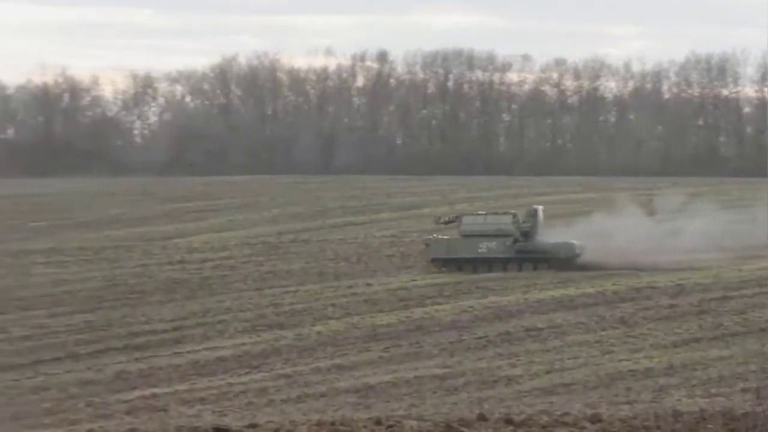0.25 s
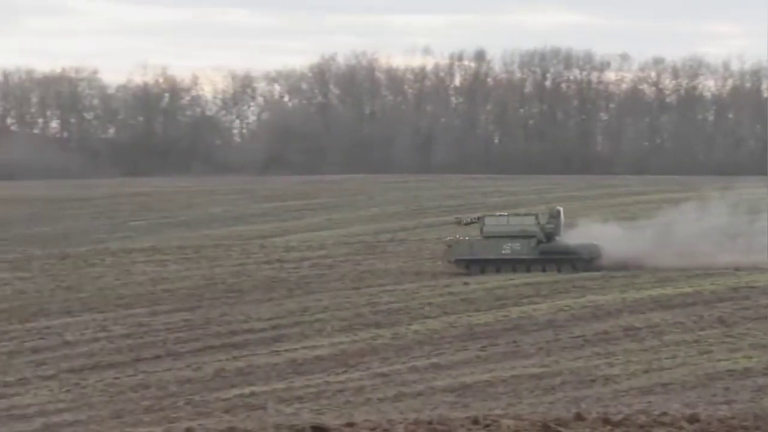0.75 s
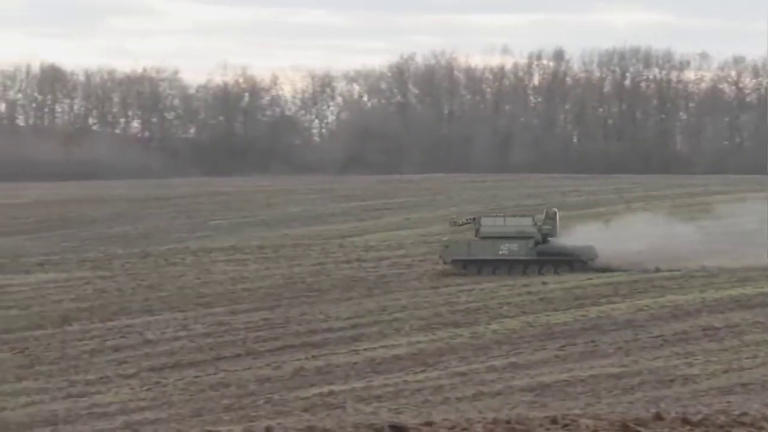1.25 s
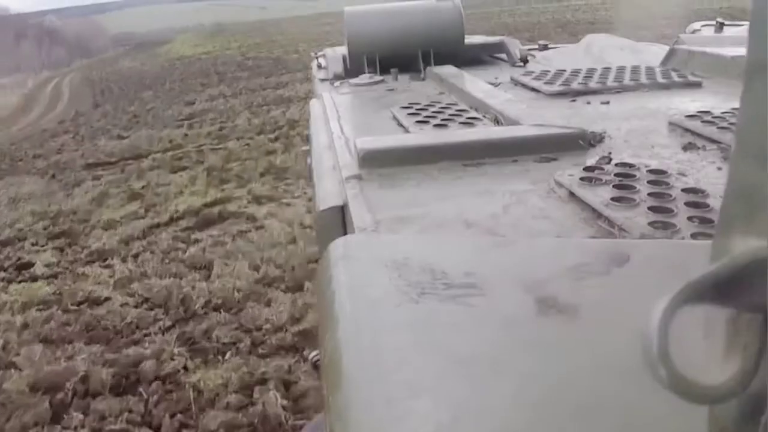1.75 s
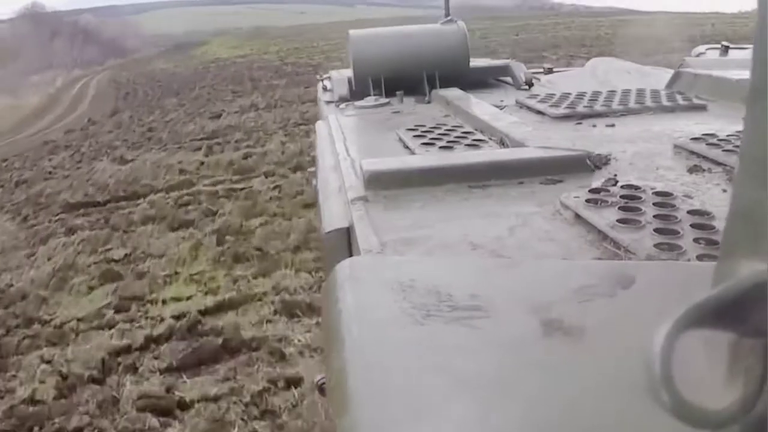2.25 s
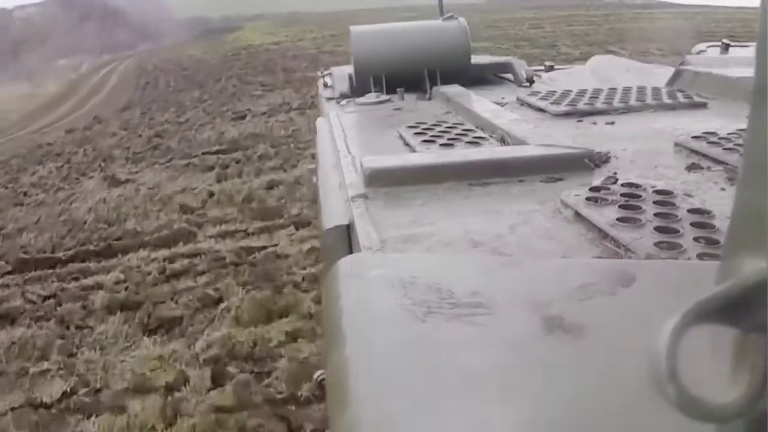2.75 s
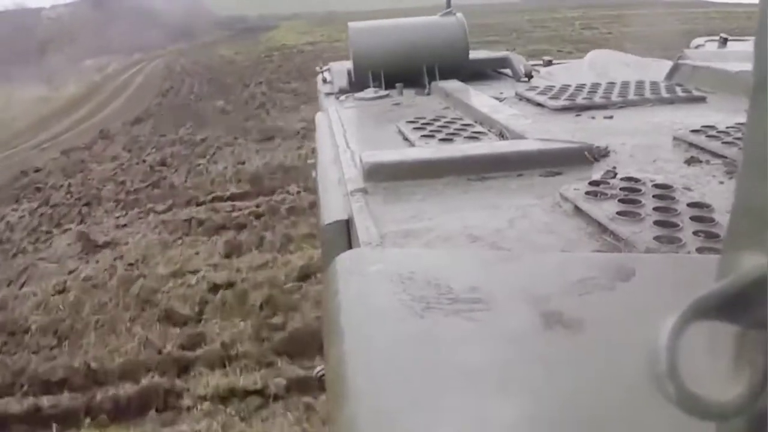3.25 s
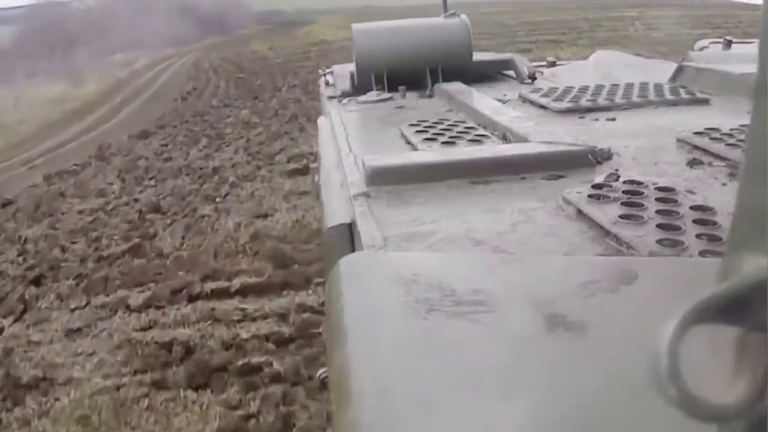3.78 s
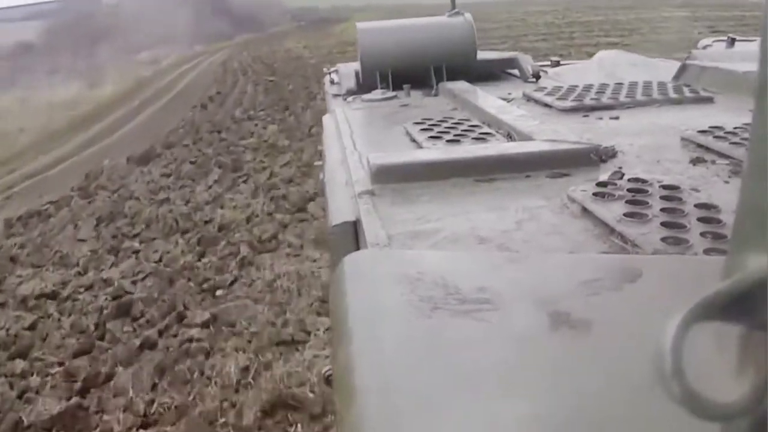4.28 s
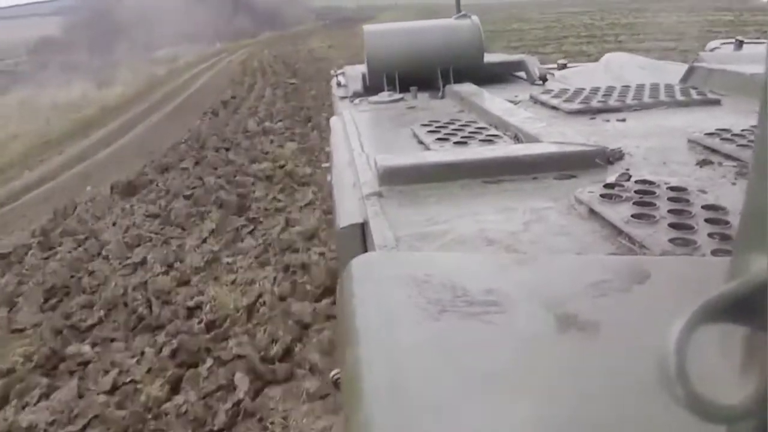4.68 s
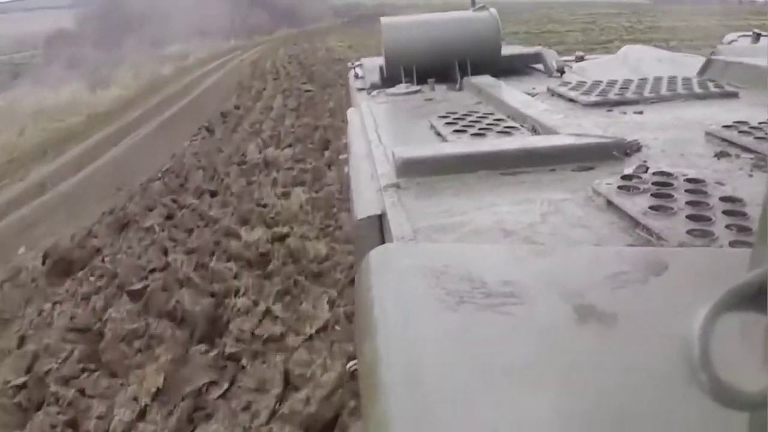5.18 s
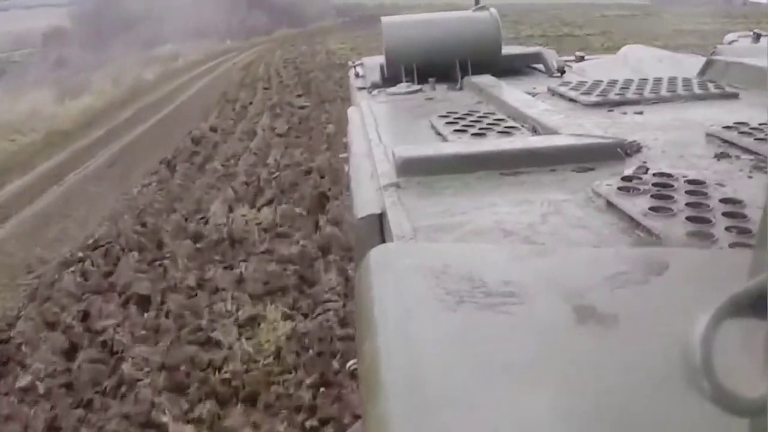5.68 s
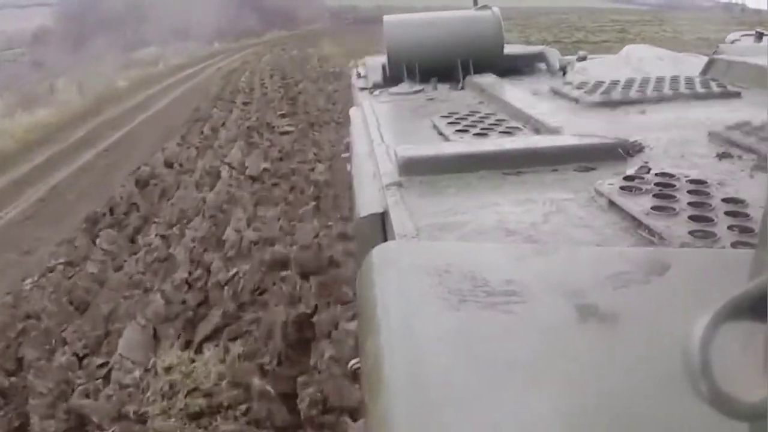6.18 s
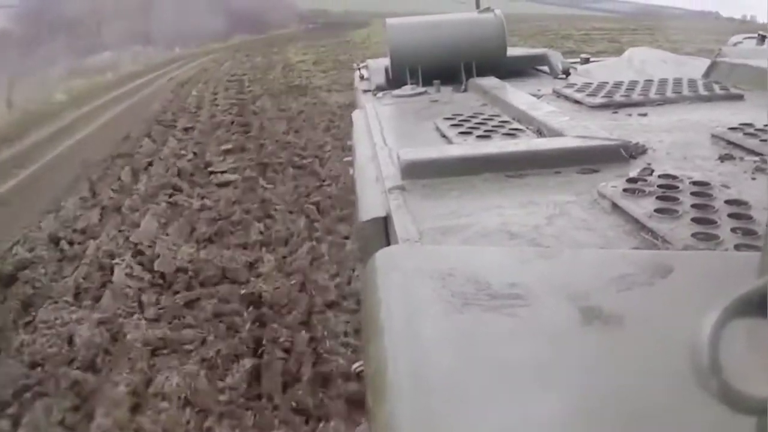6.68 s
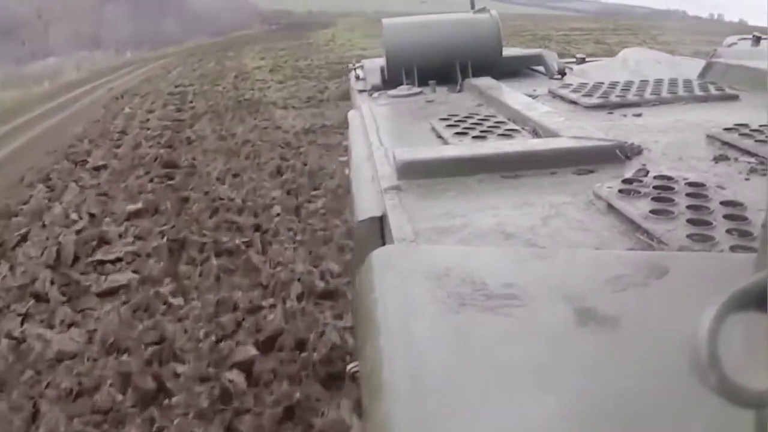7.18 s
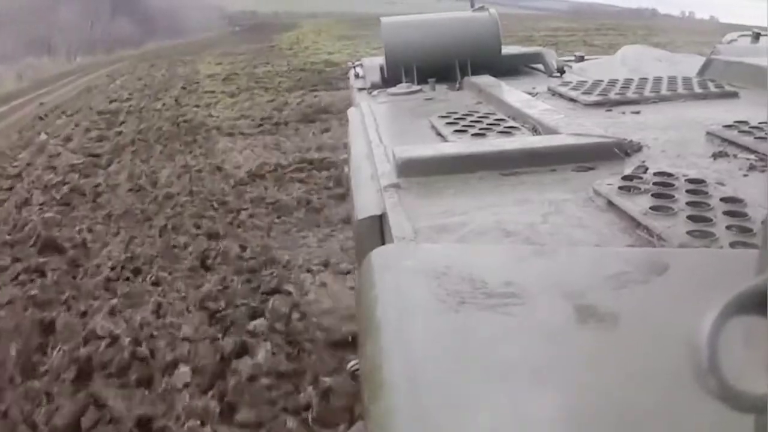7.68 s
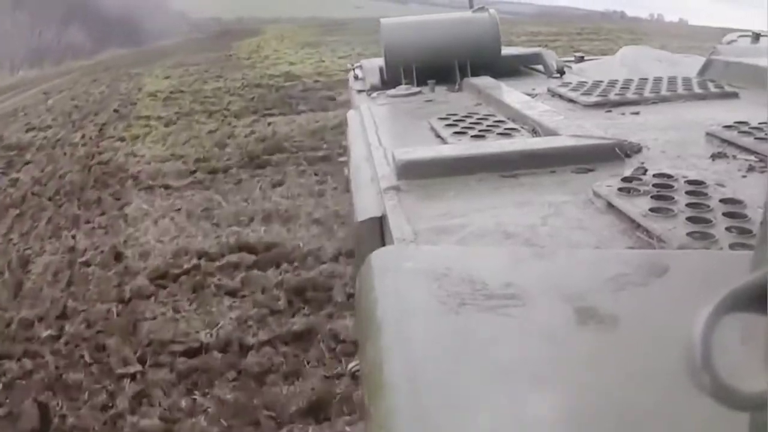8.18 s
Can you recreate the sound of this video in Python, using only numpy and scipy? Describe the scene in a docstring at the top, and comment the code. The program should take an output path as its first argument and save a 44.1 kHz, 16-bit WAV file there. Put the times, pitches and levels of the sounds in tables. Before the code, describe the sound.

Wind rumbles over faint distant tracks, then a tracked armoured vehicle is heard from on board, booming, clattering and clanking over rough ground.

```python
"""A lumpy low rumble and buffets, likely wind on the microphone, under the faint hiss of distant tracks:
an armoured vehicle crosses a ploughed field. Then the microphone rides on its deck, where the track links
beat on the wheels and, with the engine, set the hull booming. The running gear clatters as hard as the
ground is rough, flaring at jolts and easing in short lulls. Close by, the track knocks on the hull,
heavy steel parts clank and loose fittings chink. A limiter holds the peaks down."""
import sys
import numpy as np
from scipy import signal
from scipy.fft import rfft, irfft
from scipy.io import wavfile
from scipy.ndimage import uniform_filter1d, minimum_filter1d

SR = 44100
rng = np.random.default_rng(int(sys.argv[2]) if len(sys.argv) > 2 else 0)


def store_pcm(level_fs):
    """Save levels as 16-bit WAV."""
    pcm = np.round(np.clip(level_fs, -1, 1) * 32767).astype(np.int16)
    wavfile.write(sys.argv[1], SR, np.atleast_2d(pcm).T)


N = 372330
TIME = np.arange(N) / SR

# spectrum of moving air on the microphone: f/Hz, level/dB
BUFFET_SPECTRUM = [(12, -18), (28, 4), (80, 2.5), (140, -12), (300, -44), (900, -71.5), (3000, -110)]
# resonances of the deck plates: f/Hz, width/Hz, gain/dB
PLATE_MODES = [(734, 37, 4), (800, 8, 3), (1545, 110, 0), (2774, 49, -1.5)]
# spectrum of a loose fitting's dry tick: f/Hz, level/dB
TICK_SPECTRUM = [(1200, -14.5), (2600, 1.5), (3500, -7.5), (4150, -13.5), (4450, -6), (5800, -5),
                 (6600, -9), (8000, -7), (9000, -13.5), (10500, -29), (14500, -41.5)]


def from_db(db):
    return np.exp(np.asarray(db) * np.log(10) / 20)


def rms_one(x):
    return x / np.sqrt(np.mean(x ** 2) + 1e-20)


def evened(x, span_s):
    """Hold the running rms at 1."""
    return x / np.sqrt(np.abs(uniform_filter1d(x ** 2, int(span_s * SR))) + 1e-12)


def in_time(rows):
    """Columns of a curve table, one value a sample."""
    s, *columns = np.transpose(rows)
    return [np.interp(TIME, s, column) for column in columns]


def drift(per_s):
    """A random wander of rms 1, with about per_s turns a second."""
    knots = rng.standard_normal(N // 10)
    return rms_one(np.interp(TIME * per_s, np.arange(len(knots)), knots))


def butterworth(x, order, hz, kind="low"):
    return signal.sosfilt(signal.butter(order, hz, kind, fs=SR, output="sos"), x)


def bin_gains(spectrum, size):
    """A spectrum table as one gain for each FFT bin."""
    hz, db = np.transpose(spectrum)
    return from_db(np.interp(np.log(np.fft.rfftfreq(size, 1 / SR) + 1), np.log(hz), db))


def coloured(x, spectrum, size=16384):
    """Minimum-phase filter with the given spectrum: attacks stay sharp."""
    cepstrum = irfft(np.log(bin_gains(spectrum, size)))[:size // 2]
    cepstrum[1:] *= 2
    return signal.oaconvolve(x, irfft(np.exp(rfft(cepstrum, size))))[:N]


def rounded(x, spectrum, size=2048):
    """Filter with the given spectrum whose pulses swell and fall evenly, as in a soft contact."""
    pulse = np.fft.fftshift(irfft(bin_gains(spectrum, size))) * np.hanning(size)
    return signal.oaconvolve(x, pulse, mode="same")


def resonate(x, modes):
    """Parallel two-pole resonances, one for each row of f/Hz, width/Hz, gain/dB."""
    out = 0
    for hz, width_hz, db in modes:
        r = np.exp(-np.pi * width_hz / SR)
        feedback = [1, -2 * r * np.cos(2 * np.pi * hz / SR), r * r]
        out = out + from_db(db) * (1 - r * r) / 2 * signal.lfilter([1, 0, -1], feedback, x + 1e-18)
    return out


def add(out, s, sound):
    """Mix a short sound in at time s."""
    at = int(s * SR)
    out[at:at + len(sound)] += sound[:N - at]


def swells(rows):
    """Smooth humps in dB, one for each row of t/s, length/s, height/dB."""
    out = np.zeros(N)
    for s, length_s, db in rows:
        t = np.arange(-2 * length_s, 2 * length_s, 1 / SR)
        add(out, s - 2 * length_s, db * np.exp(-(2 * t / length_s) ** 2))
    return out


def grains(per_s, spread_db):
    """Random contacts of uneven strength, one impulse each."""
    at = np.flatnonzero(rng.random(N) < per_s / SR)
    strength, direction = rng.standard_normal((2, N))[:, at]
    out = np.zeros(N)
    out[at] = from_db(spread_db * np.minimum(strength, 2.5)) * np.sign(direction)
    return out


def scuff(rise_s):
    """One touch of steel on steel: noise that swells for rise_s and quickly dies."""
    t = TIME[:SR // 25] / rise_s
    return rng.standard_normal(len(t)) * (t * np.exp(1 - t)) ** 3


def chatter(per_s, spread_db, touch_s):
    """Separate touches at random moments, each a short swell of noise."""
    r = np.exp(-1 / (touch_s * SR))
    pressure = signal.lfilter([1], [1, -2 * r, r * r], np.abs(grains(per_s, spread_db)) + 1e-18)
    return rms_one(pressure) * rng.standard_normal(N)


def low_rumble():
    """In the open field, a lumpy low rumble, likely wind on the microphone."""
    # spectrum of the rumble: f/Hz, level/dB
    spectrum = [(12, -21), (22, 2.5), (55, -5), (76, 2), (100, -4), (135, -4), (200, -11.5), (300, -19.5),
                (420, -29.5), (700, -41.5), (1500, -61)]
    # its rise and fall: t/s, level/dB, gain above 150 Hz/dB
    levels = [(0, -27, 3), (.14, -29.5, -0.5), (.25, -29, 0.5), (.33, -34.5, -0.5), (.4, -32, -0.5),
              (.5, -35, -7), (.57, -30, 3), (.7, -34, -5.5), (.8, -30, -4), (.87, -30, -3),
              (1.05, -31, 2.5), (1.17, -34, 3.5), (1.22, -31.5, 1), (1.36, -31.5, 2.5), (1.46, -34, 1.5),
              (1.6, -28, 1)]
    level_db, upper_db = in_time(levels)
    rumble = evened(coloured(rng.standard_normal(N), spectrum), span_s=0.058)
    rumble = butterworth(rumble, order=4, hz=900)
    deep = butterworth(rumble, order=1, hz=150)
    return from_db(level_db) * (deep + from_db(upper_db) * (rumble - deep))


def far_tracks():
    """The distant tracks: a faint, fluttering hiss, brighter as they draw level with the microphone."""
    # spectrum of the hiss: f/Hz, level/dB
    spectrum = [(200, -16), (800, 2), (950, -1), (1250, 1), (1700, -1.5), (2000, 0), (2500, -1.5),
                (3200, -7), (4200, -14), (5000, -26), (9000, -28), (15000, -36)]
    # a faint whine in it: f/Hz, width/Hz, gain/dB
    whine_mode = [(820, 25, 3)]
    # the approach: t/s, level/dB, gain of the treble above 2 kHz/dB
    levels = [(0, -64.5, -4), (.25, -66, -3.5), (.42, -65.5, -3), (.56, -64, -2), (.8, -63, -1),
              (1.1, -61.3, 0), (1.3, -61, 0), (1.66, -61.5, -1)]
    level_db, treble_db = in_time(levels)
    hiss = rms_one(coloured(rng.standard_normal(N), spectrum)) * from_db(1.1 * drift(per_s=25))
    hiss = hiss + resonate(hiss, whine_mode)
    dull = butterworth(hiss, order=1, hz=2000)
    return from_db(level_db) * (dull + from_db(treble_db) * (hiss - dull))


def wind():
    """Gusts in the open field strike the microphone in short, deep buffets."""
    # gusts: t/s, length/s, level/dB
    gusts = [(0.09, 0.043, -23.5), (.39, 0.19, -30), (0.612, 0.042, -25.5), (1.11, 0.034, -28.5),
             (1.531, 0.041, -25.5)]
    force = sum(from_db(db) * np.exp(-(2 * (TIME - s) / length_s) ** 2) for s, length_s, db in gusts)
    return force * evened(coloured(rng.standard_normal(N), BUFFET_SPECTRUM), span_s=0.026)


def gear_load():
    """Swing of the load on the running gear in dB: jolts, lulls and the jostling of small clods."""
    # jolts, when the rattle flares: t/s, length/s, rise/dB
    jolts = [(1.695, 0.018, 4), (1.821, 0.064, 10.5), (2.067, 0.12, 4), (2.364, 0.13, 3.5),
             (2.524, 0.07, 1), (2.89, 0.038, 5), (3.224, 0.1, 2.5), (3.32, 0.065, 3), (3.795, 0.025, 3),
             (4.931, .022, 5), (5.71, 0.17, 5), (6.43, 0.061, 1), (7.181, .015, -1), (7.69, 0.076, 4.5),
             (7.756, 0.019, 10), (7.929, 0.02, 10)]
    # lulls, when the track runs lightly: t/s, length/s, drop/dB
    lulls = [(1.73, 0.033, 10.5), (1.88, 0.018, 14), (1.943, 0.02, 15), (1.988, 0.035, 12.5),
             (2.165, 0.076, 6), (2.297, 0.022, 5.5), (2.468, 0.11, 8), (2.844, 0.035, 11), (3.14, 0.061, 9),
             (3.368, 0.032, 8.5), (3.404, 0.03, 3), (3.717, 0.072, 9), (4.012, 0.038, 6.5),
             (4.145, 0.014, 5.5), (4.5, 0.011, 7), (4.659, 0.012, 8), (4.993, 0.039, 12.5),
             (5.288, 0.034, 7), (5.465, 0.014, 17), (5.547, 0.1, 5.5), (5.591, 0.013, 10), (5.851, .014, 4),
             (5.875, .025, 7.5), (5.918, 0.011, 6.5), (6.116, 0.1, 12), (6.325, 0.015, 3),
             (6.354, 0.04, 5.5), (6.562, .019, 10), (6.768, 0.02, 14), (7.03, 0.079, 8), (7.142, .018, 6.5),
             (7.472, 0.016, 10), (7.59, 0.1, 9.5), (7.726, 0.022, 14), (7.812, 0.1, 10), (7.907, 0.016, 4),
             (8.07, 0.029, 10)]
    return swells(jolts) - swells(lulls) + 2.14 * drift(per_s=28)


def hull(links, load_db):
    """Link blows and the churn of engine and ground set the hull booming under the microphone."""
    # hull resonances: f/Hz, width/Hz, gain/dB
    modes = [(52.3, 1.3, -21), (79.36, 6.6, 5), (102.6, 8.7, 8.5), (126.3, 9.5, 5), (153.8, 5.6, -2.5),
             (172.8, 6.1, -3), (221, 3.3, -32.5)]
    blows = np.diff(np.floor(links), prepend=0) * (1 + 0.66 * rng.standard_normal(N))
    drive = rms_one(rng.standard_normal(N)) + from_db(-14) * rms_one(blows)
    boom = butterworth(resonate(drive, modes), order=3, hz=[34, 245], kind="band")
    wavering_s = np.cumsum(1 + 0.035 * drift(per_s=5)) / SR   # the pitch wavers by 3.5 %
    boom = np.interp(wavering_s, TIME, boom, period=N / SR)
    return from_db(-22.5 + 0.37 * load_db) * evened(boom, span_s=0.11)


def track_hum(links):
    """The beat of the links hums, throbbing and wavering as the track slackens and tightens."""
    # hum at the link rate: t/s, level/dB
    first_levels = [(1.67, -34), (2.1, -27), (2.4, -24.5), (3.0, -22.5), (3.25, -25.5), (3.45, -27),
                    (3.72, -24.5), (3.9, -22), (4.3, -27.5), (5.1, -25.5), (5.6, -28), (5.8, -25),
                    (6.2, -20.5), (6.38, -26.5), (6.62, -21), (6.78, -30.5), (6.9, -26.5), (7.35, -22),
                    (7.5, -30), (8.1, -24.5), (8.3, -21.5), (8.44, -30)]
    # its third harmonic: t/s, level/dB
    third_levels = [(1.67, -35.5), (2.2, -36), (2.36, -24), (2.72, -24.5), (2.85, -28.5), (3.4, -29.5),
                    (3.55, -19), (3.68, -30.5), (4.28, -27.5), (4.42, -26.5), (4.8, -27), (5.15, -23.5),
                    (5.42, -23.5), (5.6, -25.5), (6.8, -30.5), (7.6, -27.5), (8.2, -28), (8.36, -21.5)]
    throb_db, throbs_per_s = 2, 17
    first_db = in_time(first_levels)[0] - 3 + throb_db * drift(throbs_per_s)
    first = from_db(first_db) * np.sin(2 * np.pi * links + 1.02 * drift(per_s=12))
    third_db = in_time(third_levels)[0] - 2.5 + throb_db * drift(throbs_per_s)
    third = from_db(third_db) * np.sin(2 * np.pi * 3 * links + 1.09 * drift(per_s=15))
    return np.sqrt(2) * (first + third)


def wheels(beat, thump_db):
    """Below the deck, road wheels drop off the links and over clods with dull, uneven thumps."""
    # spectrum of a thump: f/Hz, level/dB
    spectrum = [(100, 1.5), (220, 12.5), (270, -4.5), (312, 7.5), (345, 0.5), (470, -0.5), (620, -8),
                (900, -11), (1700, -22), (3000, -61)]
    thumps = grains(per_s=500, spread_db=4) * beat
    return from_db(thump_db - 1) * evened(coloured(thumps, spectrum), span_s=0.17)


def running_gear(beat, clatter_db):
    """Pins and links clatter on the beat and ring the plates; near the end a steel part rings along."""
    # the gear as heard through the deck: f/Hz, level/dB
    spectrum = [(200, -18.5), (480, -0.5), (640, -0.5), (1000, -3), (1400, -0.5), (1900, -4.5),
                (2500, -5.5), (3100, -15), (3700, -13), (4150, -20), (5000, -18), (7500, -28),
                (11000, -55.5)]
    # how hard the clatter shakes the steel part: t/s, gain/dB
    part_drive = [(7.8, -41), (7.92, -2.5), (8.0, -3.5), (8.44, -10)]
    # that part's resonance: f/Hz, width/Hz, gain/dB
    part_mode = [(2200, 160, 7.9)]
    contacts = grains(per_s=2400, spread_db=-1.5) * beat
    through_deck = coloured(contacts + resonate(contacts, PLATE_MODES), spectrum)
    clatter = from_db(clatter_db - 3) * evened(through_deck, span_s=0.051)
    shaking_db = in_time(part_drive)[0] + 3 * drift(per_s=31)
    return clatter + resonate(clatter * from_db(shaking_db), part_mode)


def plate_whine(load_db, hz=734):
    """One deck plate, kept ringing by the engine, sings on through the lulls."""
    ringing = rng.standard_normal(N)
    for width_hz in (26, 90):
        ringing = resonate(ringing, [(hz, width_hz, 0)])
    return from_db(-55.5 + 0.3 * load_db) * evened(ringing, span_s=0.049)


def fittings(links, jingle_db):
    """Loose fittings near the microphone tick, hardest once a link; each rings at its own pitch."""
    # resonances of the fittings: f/Hz, width/Hz, gain/dB
    modes = [(4570, 430, 11.5), (5080, 210, 10), (5330, 120, 11), (7550, 1500, 0)]
    ticks = chatter(per_s=130, spread_db=6, touch_s=0.001) + from_db(-12) * rng.standard_normal(N)
    rings = np.zeros(N)
    for mode in modes:
        own_touches = chatter(per_s=70, spread_db=4.5, touch_s=0.002)
        rings += resonate(own_touches + 0.7 * ticks, [mode])
    link_accent = from_db(4 * np.cos(2 * np.pi * links))
    jingle = coloured((ticks + rings) * link_accent, TICK_SPECTRUM)
    return from_db(jingle_db - 3) * evened(jingle, span_s=0.09)


def draught():
    """On the moving deck the air stream flutters deep and unevenly on the microphone."""
    level_db = -45.5 + 3.7 * drift(per_s=5)
    return from_db(level_db) * rms_one(coloured(rng.standard_normal(N), BUFFET_SPECTRUM))


def knocks(clatter_db):
    """The track slaps the hull and rings its plates; the hard blows also grind and crack."""
    # hard knocks: t/s, dull blow/dB, bright crack/dB
    hard_knocks = [(1.671, -25.5, -49), (2.084, -22, -50), (2.349, -17, -49), (2.385, -21, -32.5),
                   (2.427, -20, -56), (2.531, -20.5, -40), (2.914, -26, -35), (2.929, -27, -45),
                   (2.97, -24, -41), (2.988, -17, -39), (3.191, -22.5, -47), (3.618, -23.5, -50),
                   (3.782, -21.5, -42), (3.836, -20, -48), (4.367, -21.5, -61), (4.438, -20.5, -46),
                   (4.474, -21.5, -50), (4.525, -18.5, -38), (4.569, -25, -40), (4.637, -23, -38),
                   (4.697, -20, -38), (4.727, -23.5, -44), (4.746, -26.5, -50), (4.847, -29, -52),
                   (4.858, -26, -52), (4.912, -20.5, -48), (4.926, -20.5, -34), (5.047, -26.5, -44),
                   (5.063, -23, -38), (5.084, -20.5, -34), (5.121, -21, -32.5), (5.154, -38, -49),
                   (5.191, -20, -33.5), (5.31, -25, -52), (5.347, -24, -43), (5.392, -25, -54),
                   (5.405, -21.5, -49), (5.504, -23, -56), (5.577, -26, -55), (5.613, -17, -41),
                   (5.725, -22, -41), (5.745, -22, -48), (5.801, -22, -51), (5.822, -25, -53),
                   (5.859, -20, -56), (5.894, -16, -33), (5.931, -22.5, -42), (5.963, -22, -41),
                   (6.039, -28, -41), (6.096, -28.5, -52), (6.135, -20, -39), (6.156, -34.5, -53),
                   (6.21, -19.5, -42), (6.285, -23, -35), (6.337, -19, -39), (6.414, -26, -46),
                   (6.451, -24, -40), (6.466, -22.5, -48), (6.572, -23, -35.5), (6.721, -20, -42),
                   (6.963, -23, -55), (7.153, -26, -57), (7.209, -25, -58), (7.298, -19.5, -49),
                   (7.407, -21.5, -54), (7.426, -24, -57), (7.922, -29.5, -33), (7.932, -23, -31),
                   (7.948, -23.5, -53), (8.323, -19, -51)]
    # hull plates that a knock sets booming: f/Hz, width/Hz, gain/dB
    body_modes = [(340, 34, -4.5), (442, 19, -1.5), (532, 72, -0.5), (633, 45, -4.5), (1470, 130, -4.5)]
    # spectrum of a heavy blow: f/Hz, level/dB
    thud_spectrum = [(40, 1.5), (110, 11), (200, 19), (400, 10.5), (800, 2.5), (1200, 2.5), (1600, 1),
                     (1900, -19.5), (3000, -25.5), (6000, -35), (11000, -60)]
    # spectrum of steel cracking on steel: f/Hz, level/dB
    crack_spectrum = [(800, -21), (1700, -3), (2400, 5), (3200, -9), (4200, -13), (5200, -10), (7500, -15),
                      (11000, -39)]
    grind_s = 0.004997   # the link grinds on the wheel around each hard blow
    blows = grains(per_s=6, spread_db=2.5) * from_db(clatter_db + 3)   # lighter slaps at random
    cracks = np.zeros(N)
    for s, blow_db, crack_db in hard_knocks:
        grind, touch = scuff(grind_s), scuff(rise_s=0.003)
        add(blows, s, from_db([blow_db]))
        add(blows, s - grind_s, from_db(blow_db - 7) * grind / np.linalg.norm(grind))
        add(cracks, s - 0.002, from_db(crack_db) * touch / np.linalg.norm(touch))
    struck_hull = blows + resonate(blows, body_modes) + from_db(-9) * resonate(blows, PLATE_MODES)
    thuds = rounded(struck_hull, thud_spectrum)
    return from_db(15.5) * thuds + from_db(25) * coloured(cracks, crack_spectrum)


def clanks():
    """Heavier steel parts collide: a brief pitched ring, the deck plates answering, a bright splash."""
    # collisions as the ride jolts: t/s, ring level/dB, f/Hz, splash level/dB
    collisions = [(1.69, -33.5, 2420, -46), (1.782, -40, 1770, -53), (1.814, -33, 2700, -45),
                  (1.8297, -38, 2400, -50), (1.8514, -39, 1710, -53), (1.9047, -42, 1820, -56),
                  (2.0258, -44, 2340, -62), (2.1084, -37, 1700, -45), (2.2313, -32, 2110, -65),
                  (2.2717, -38, 2270, -58), (2.5724, -46, 2400, -46), (2.675, -41, 2170, -60),
                  (2.761, -39, 1790, -51), (2.886, -36, 2300, -55), (3.0895, -31.5, 1730, -49),
                  (3.1208, -45, 2100, -66), (3.242, -34.5, 2680, -53), (3.936, -41, 2200, -55),
                  (3.9579, -34.5, 2370, -47), (4.114, -34, 2730, -58), (4.556, -41, 2700, -60),
                  (4.9262, -38, 2120, -53), (5.7064, -37, 2590, -51), (5.7484, -38, 2060, -46),
                  (5.8361, -41, 2460, -54), (5.9824, -40, 2710, -54), (6.2274, -30, 1720, -50),
                  (6.3686, -40, 2710, -54), (6.435, -42, 1910, -58), (7.1112, -36.5, 2100, -54),
                  (7.1791, -34.5, 2660, -55), (7.3507, -34.5, 2850, -45), (7.7528, -38, 1950, -53),
                  (8.0052, -34.5, 2320, -57), (8.194, -41, 1810, -62), (8.3474, -37, 2150, -56)]
    # spectrum of the splash: f/Hz, level/dB
    splash_spectrum = [(1500, -10.5), (3000, 0.5), (4100, -9), (5200, 2), (6500, -0.5), (8200, 4.5),
                       (9200, -11), (10500, -22), (14000, -44.5)]
    rings, splashes = np.zeros((2, N))
    for s, ring_db, hz, splash_db in collisions:
        touch = scuff(rise_s=0.0028)
        ring = resonate(touch, [(hz, 110, 0), (2500, 600, -7)])
        ring += from_db(-15) * resonate(touch, PLATE_MODES)
        add(rings, s, from_db(ring_db - 3.5) * ring / np.abs(ring).max())
        add(splashes, s, from_db(splash_db + 4) * touch / np.abs(touch).max())
    return rings + from_db(6) * coloured(splashes, splash_spectrum)


def chinks():
    """The hardest touches of the fittings: close modes beat in a sharp ping and ring on faintly."""
    # hard touches: t/s, level/dB, f/Hz struck hardest
    touches = [(1.839, -37, 4470), (2.112, -34, 4730), (2.142, -44, 4650), (2.179, -44.5, 4650),
               (2.232, -38, 4900), (2.338, -31.5, 4620), (2.492, -44, 5200), (2.515, -40, 4700),
               (2.537, -43, 4650), (2.57, -39.5, 4730), (2.591, -43, 4740), (2.657, -45, 5170),
               (2.764, -38, 5370), (2.788, -35, 5330), (2.818, -37, 5240), (2.888, -41, 4900),
               (2.925, -39, 4660), (2.976, -37.5, 5350), (3.009, -38, 5300), (3.047, -43, 4650),
               (3.152, -42.5, 4700), (3.222, -36, 5440), (3.803, -39, 5080), (3.827, -39, 5270),
               (3.863, -38, 4530), (3.885, -32.5, 4320), (3.904, -34.5, 4490), (3.948, -38, 5050),
               (4.051, -27, 5230), (4.076, -30.5, 4480), (4.487, -37.5, 4800), (4.535, -34, 4600),
               (4.67, -37, 4830), (4.941, -38, 4640), (5.482, -40, 4650), (5.689, -31.5, 5190),
               (5.81, -40, 5270), (6.031, -28.5, 5300), (6.048, -34, 5030), (6.182, -30, 4600),
               (6.201, -32, 5150), (6.223, -29, 5100), (6.24, -37, 4650), (6.268, -35, 5000),
               (6.346, -38, 5100), (6.382, -33, 5400), (6.401, -29, 4600), (6.419, -37, 4700),
               (6.459, -27, 5070), (6.622, -33.5, 4670), (6.676, -33.5, 4640), (7.182, -38, 4600),
               (7.288, -36, 4670), (7.347, -32, 4580), (8.032, -39, 5000), (8.296, -36.5, 4600)]
    # the fittings' modes, broad ones and lingering ones: f/Hz, width/Hz, gain/dB
    modes = [(4600, 170, 0), (4714, 50, 1.5), (5070, 170, 1.5), (5400, 110, -8), (5370, 40, 4)]
    falloff_db_per_hz = 0.04   # modes far from the struck frequency get less of the touch
    out = np.zeros(N)
    for s, level_db, struck_hz in touches:
        touch = np.pad(scuff(rise_s=0.0016), (0, SR // 25))
        struck = [(hz, width, db - falloff_db_per_hz * abs(hz - struck_hz)) for hz, width, db in modes]
        chink = resonate(touch, struck) + from_db(-28) * touch
        add(out, s, from_db(level_db) * chink / np.abs(chink).max())
    return from_db(8.5) * coloured(out, TICK_SPECTRUM)


def scene():
    """One microphone, first far off in the field, then on deck, where one load sways boom and rattle."""
    # track speed: t/s, link rate/Hz
    speed = [(1.67, 56.4), (3.0, 52), (4.0, 53.9), (5.0, 53.3), (6.0, 54.1), (7.0, 52), (8.44, 55.6)]
    # how hard the ground works the running gear: t/s, clatter/dB, jingle/dB, thumps/dB
    ground = [(1.67, -49, -59.5, -42.5), (2.35, -42, -56.5, -41.5), (2.6, -44.5, -54.5, -36.5),
              (2.95, -40, -51.5, -34.5), (3.45, -44.5, -57, -41), (4.05, -40, -49, -35),
              (4.3, -47.5, -60.5, -50), (4.55, -41.5, -56, -37), (5.1, -44.5, -53, -36),
              (5.5, -44, -51.5, -39), (5.75, -44, -52.5, -35.5), (6.25, -38.5, -44.5, -29),
              (6.55, -46, -52, -40), (6.95, -46, -56.5, -38.5), (7.35, -44, -52.5, -36),
              (7.6, -47, -61.5, -40), (7.95, -45.5, -52.5, -35.5), (8.44, -43.5, -63, -38.5)]
    links = np.cumsum(in_time(speed)[0]) / SR   # count of links gone by
    load_db = gear_load()
    db_per_load_db = [1, 1.09, 0.67]
    clatter_db, jingle_db, thump_db = in_time(ground) + np.outer(db_per_load_db, load_db)
    boom = hull(links, load_db) + track_hum(links)
    hull_swing = evened(np.gradient(boom), span_s=0.17)
    # contacts hit harder once a link, and rise and fall with each swing of the hull
    beat = from_db(2.65 * np.cos(2 * np.pi * links) + hull_swing + 2.6 * drift(per_s=105))
    deck = boom + wheels(beat, thump_db) + running_gear(beat, clatter_db) + plate_whine(load_db)
    deck = deck + knocks(clatter_db) + clanks() + fittings(links, jingle_db) + chinks() + draught()
    field = low_rumble() + far_tracks() + wind()
    aboard_s, crossfade_s = 1.668, 0.002
    aboard = np.clip((TIME - aboard_s) / crossfade_s, 0, 1)
    return ((1 - aboard) * field + aboard * deck)[None]


def limiter(x, ceiling_db, release_db_per_s):
    """The gain ducks just ahead of each peak and recovers at a steady rate."""
    over_db = np.maximum(20 * np.log10(np.abs(x) + 1e-9) - ceiling_db, 0)
    release_db = release_db_per_s * TIME
    duck_db = np.maximum.accumulate(over_db + release_db, axis=-1) - release_db
    gain_db = uniform_filter1d(minimum_filter1d(-duck_db, size=129), size=129)
    return x * from_db(gain_db)


def record(dry):
    """The recorder limits the peaks and cuts the top steeply, 70 dB down at 15 kHz."""
    held = limiter(dry, ceiling_db=-10.3, release_db_per_s=137.5)
    return signal.sosfilt(signal.cheby2(12, 70, 15000, fs=SR, output="sos"), held)


dry = scene()
out = record(dry)
store_pcm(out)
```